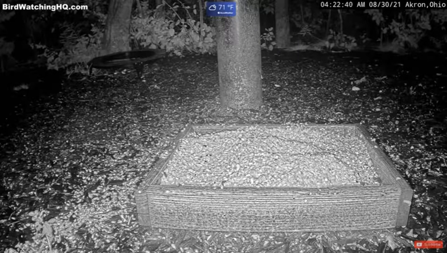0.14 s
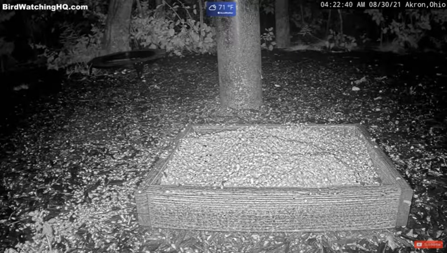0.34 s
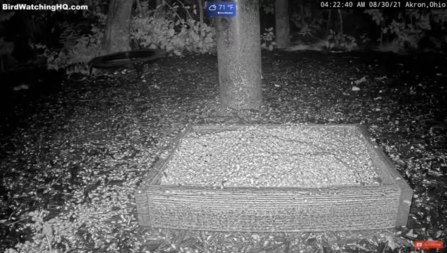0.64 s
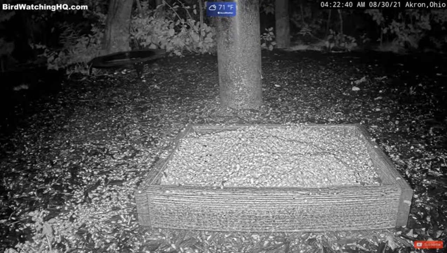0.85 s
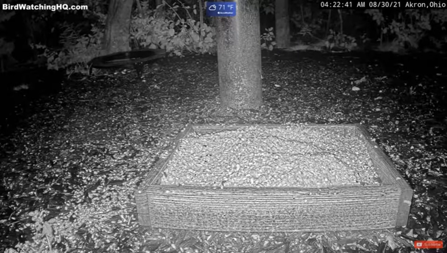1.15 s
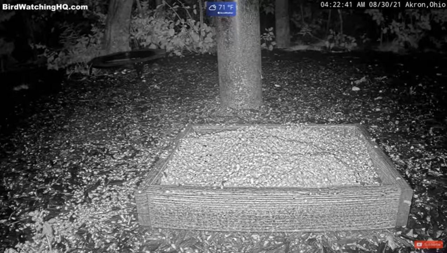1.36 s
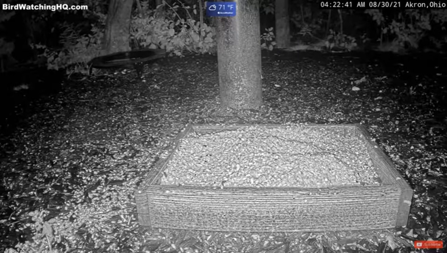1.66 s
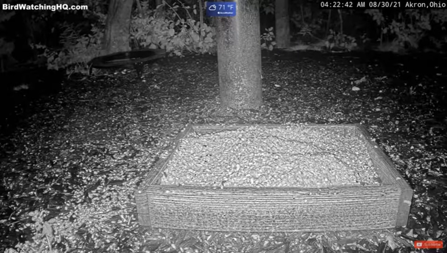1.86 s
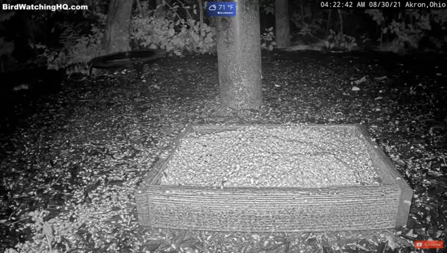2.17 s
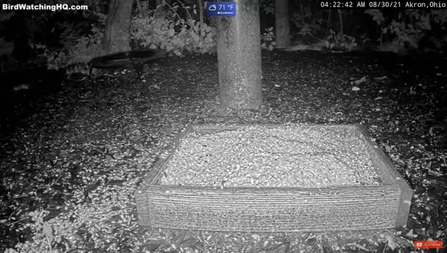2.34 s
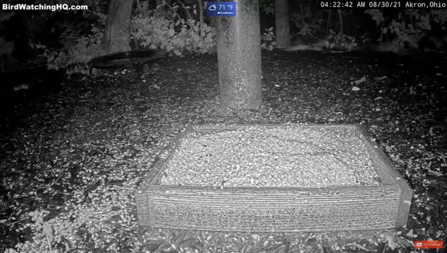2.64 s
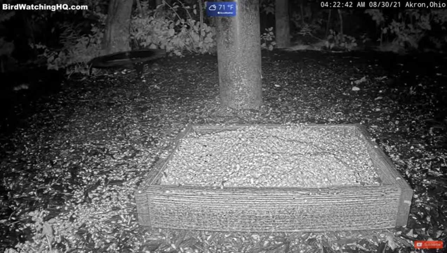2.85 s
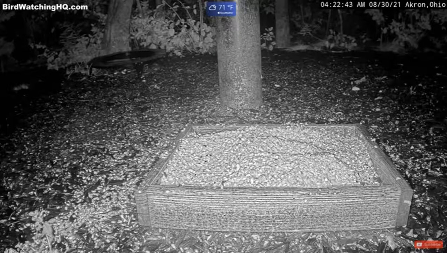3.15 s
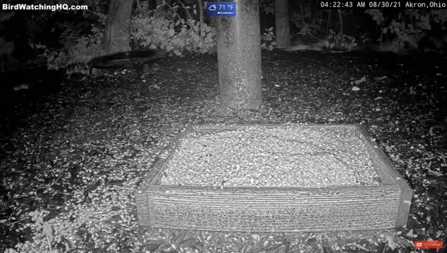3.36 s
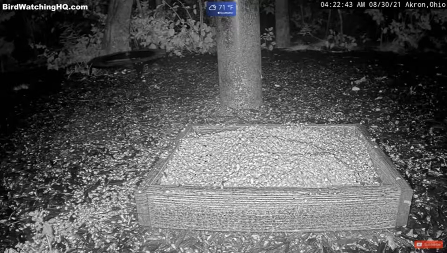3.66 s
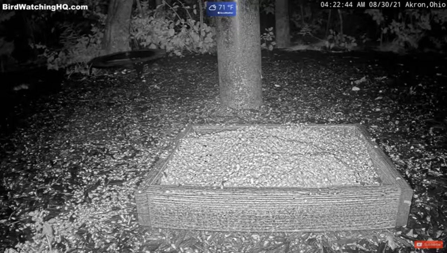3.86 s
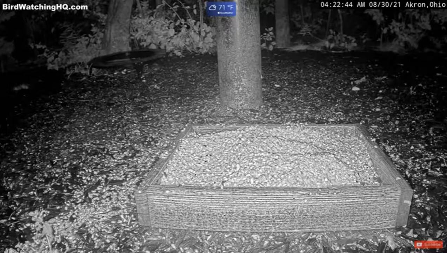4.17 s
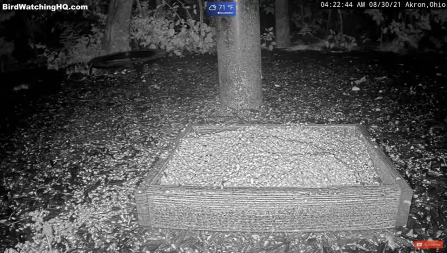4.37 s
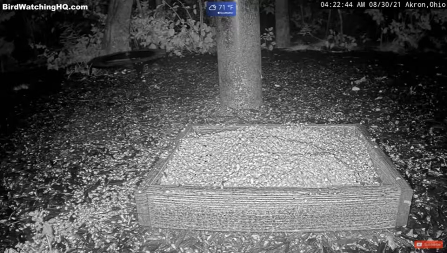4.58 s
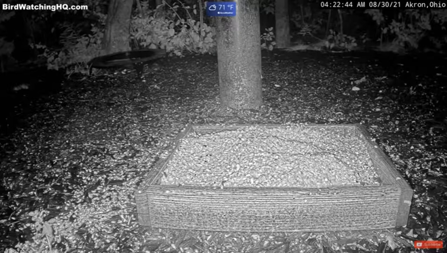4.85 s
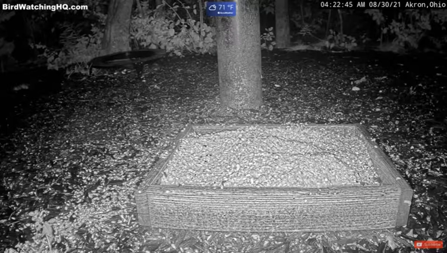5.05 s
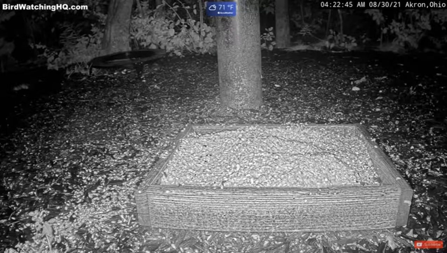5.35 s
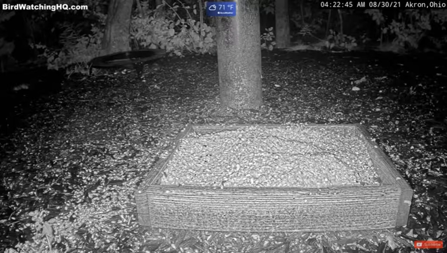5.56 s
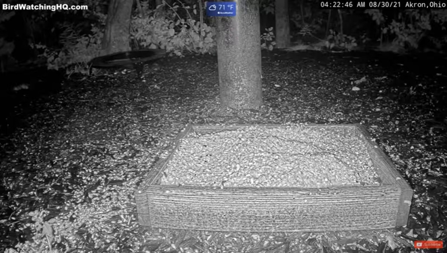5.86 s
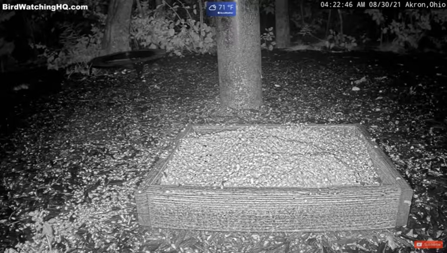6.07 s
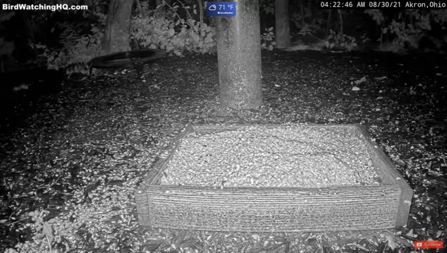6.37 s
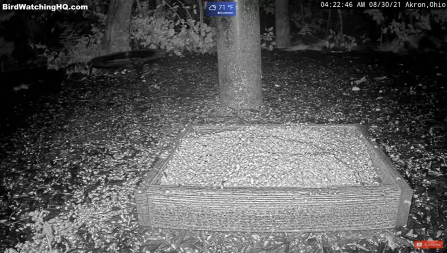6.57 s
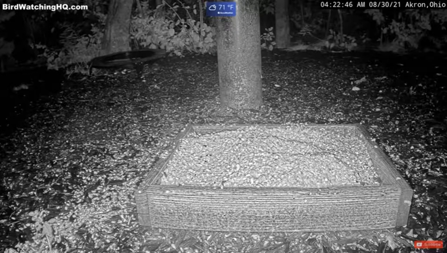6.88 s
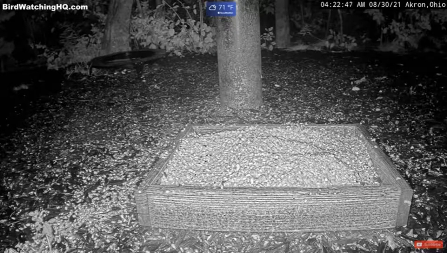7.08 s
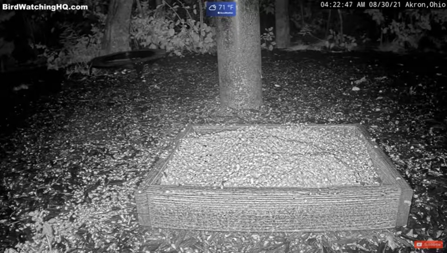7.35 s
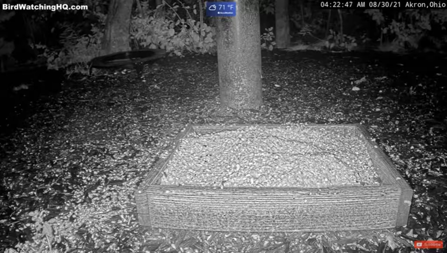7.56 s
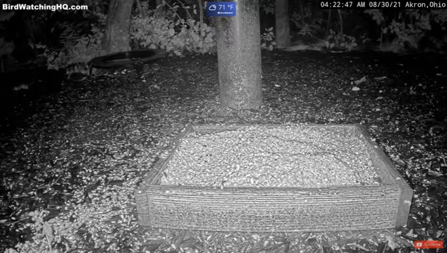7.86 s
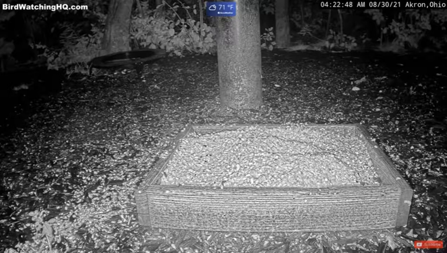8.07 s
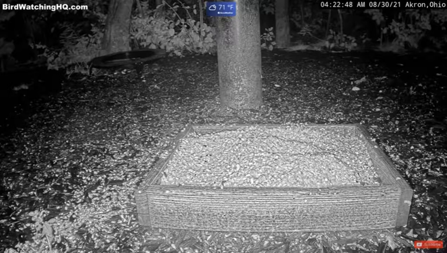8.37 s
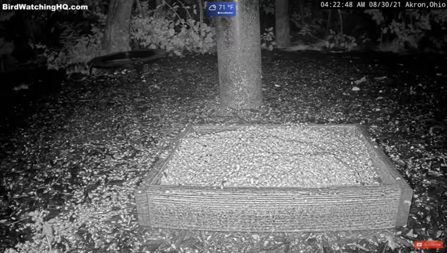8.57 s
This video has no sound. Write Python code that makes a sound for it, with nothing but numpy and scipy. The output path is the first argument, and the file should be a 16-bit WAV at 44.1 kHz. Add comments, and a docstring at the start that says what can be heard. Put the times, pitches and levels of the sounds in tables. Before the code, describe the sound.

Raccoons quarrel in a garden at night with shrill, rasping screeches and short yips. The first bouts are loud and close to the microphone. In a pause, dry leaves tick a few times, then more screeches follow from farther off, with a slight echo from the trees. A faint low growl swells with the cries. Crickets trill high and steady throughout, over a soft hiss and distant traffic hum.

```python
"""Raccoons quarrel at night

Raccoons screech at each other in a garden, first near, then farther off. Their vocal folds flip
between a clear shrill tone, a tone an octave lower (a doubled period) and rasping chaos.
Crickets trill with their wings, far traffic hums, a low growl swells, dry leaves tick and trees echo."""
import sys
import numpy as np
from scipy import signal
from scipy.fft import rfft, irfft, next_fast_len
from scipy.io import wavfile
from scipy.ndimage import uniform_filter1d, map_coordinates

SR = 44100
rng = np.random.default_rng(int(sys.argv[2]) if len(sys.argv) > 2 else 0)


def wav_out(sig):
    """Save sig, one row per channel (or a flat mono array), as 16-bit PCM at SR to the path in sys.argv[1]."""
    wavfile.write(sys.argv[1], SR, np.round(np.clip(np.atleast_2d(sig).T, -1, 1) * 32767).astype(np.int16))


N = 384540


def amp(db):
    """Turn decibels into a gain."""
    return 10 ** (np.asarray(db) / 20)


def unit(x):
    """Scale x to an average strength (rms) of 1."""
    return x / np.sqrt(np.mean(x ** 2) + 1e-20)


def along(points, hz):
    """Read between (frequency, value) points on a log frequency axis."""
    f, values = np.transpose(points)
    return np.interp(np.log(hz + 1), np.log(f + 1), values)


def curves(rows):
    """Turn each column after the time into one value per sample."""
    times, *columns = np.transpose(rows)
    return [np.interp(np.arange(N) / SR, times, column) for column in columns]


def held(rows, rest, fade_s):
    """Hold each row's values from its start to its end, fading to the resting ones in between."""
    out = np.outer(rest, np.ones(N))
    for start, end, *values in rows:
        out[:, round(start * SR):round(end * SR)] = np.array(values)[:, None]
    return uniform_filter1d(out, size=max(round(fade_s * SR), 1), axis=1)


def wobble(rate):
    """A smooth curve through `rate` random points a second."""
    points = rng.standard_normal(int(N * rate / SR) + 4)
    return map_coordinates(points, [np.arange(N) * rate / SR], order=2)


def filtered(x, response):
    """Scale each frequency in x by response(hz)."""
    size = next_fast_len(N + 8192)
    return irfft(rfft(x, size) * response(np.fft.rfftfreq(size, 1 / SR)), size)[:N]


def rush(spectrum, patchy_db):
    """Rushing noise of strength 1, with random louder and softer patches."""
    frames = signal.stft(rng.standard_normal(N + 512), nperseg=512)[2]
    patches = uniform_filter1d(rng.standard_normal(frames.shape), size=4, axis=0)
    patches = uniform_filter1d(patches, size=8, axis=1)
    noise = signal.istft(frames * amp(patchy_db * unit(patches)), nperseg=512)[1][:N]
    return unit(filtered(noise, lambda hz: amp(along(spectrum, hz))))


# How the throat favours some frequencies over others: f/Hz, relative level/dB
THROAT_SHAPE = [(240, -49.5), (400, -37), (733, -34), (1150, -17), (1470, -12.5), (2070, -3), (2210, 3),
                (3000, -3.5), (4280, -4.5), (4630, -0.5), (5420, -3), (6100, 4.5), (7530, -3), (8370, 4),
                (9300, -9.5), (12100, -64), (20500, -120)]
# Where the folds lock into a tone or lose it: start t/s, end t/s, chaos/0-1, period doubling/0-1
FOLD_STATES = [(.105, .135, .25, .2), (.155, .185, .35, .4), (.6, .66, .45, .8), (.66, .755, .3, .15),
               (.755, .84, .52, .2), (.86, .9, .35, .3), (1.82, 1.885, .4, .8), (1.885, 1.945, .08, .65),
               (1.945, 2.0, .5, .7), (2.065, 2.14, .35, .15), (2.16, 2.4, .85, .5), (4.17, 4.215, .35, .7),
               (4.215, 4.32, .42, .6), (4.44, 4.58, .22, .15), (4.58, 4.66, .5, .25), (5.15, 5.34, .32, .3),
               (5.34, 5.45, .52, .2), (5.48, 5.92, .88, .5), (6.33, 6.39, .45, .7), (6.49, 6.6, .3, .15),
               (6.69, 6.8, .4, .2), (7.28, 7.395, .2, .9), (7.395, 7.5, .45, .3), (8.13, 8.48, .24, .05),
               (8.48, 8.55, .42, .3), (8.55, 8.66, .3, .1)]
def vocal_folds(pitch):
    """Vibrating folds make overtones; chaos smears them into torn air. The throat colours both."""
    chaos, doubling = held(FOLD_STATES, rest=[.75, .45], fade_s=.03)
    waver = .014 * wobble(45) + (.003 + .02 * chaos) * wobble(250)
    shaky = 1 + waver + .1 * chaos ** 2 * wobble(500)  # chaos makes the cycles uneven
    phase = 2 * np.pi * np.cumsum(pitch * shaky) / SR
    tone, power = np.zeros(N), np.zeros(N)
    for k in range(1, 12):
        # darker than the air, and weak at the bottom
        size = amp(along(THROAT_SHAPE, k * pitch) - 3.2 * np.log2(k) - 10 * (k == 1))
        size *= doubling if k % 2 else 1  # odd overtones come with the doubled period
        tone += size * amp(5.37 * wobble(30)) * np.sin(k * phase + rng.uniform(0, 2 * np.pi))
        power += size ** 2
    tone *= amp(2.5 * wobble(60) + 4 * chaos * wobble(300)) / np.sqrt(power)  # flutter and rasp
    puffs = (1 + 0.44 * np.cos(2 * phase)) * amp(0.67 * wobble(220))  # one per cycle of the shrill tone
    breath = puffs * rush([(100, 0)], patchy_db=5.0)
    air = unit(filtered(breath, lambda hz: amp(along(THROAT_SHAPE, hz))))
    return np.sqrt(1 - chaos ** 2.4) * tone + chaos ** 1.2 * air


def mouth(x, centre_hz, width_hz, lift_db):
    """The mouth boosts one band, which moves as the jaws open and close."""
    hz, t, frames = signal.stft(x, SR, nperseg=256)
    centre = centre_hz[np.minimum((t * SR).astype(int), N - 1)]
    boost = amp(lift_db / (1 + ((hz[:, None] - centre) / width_hz) ** 2))
    return signal.istft(frames * boost, SR, nperseg=256)[1][:N]


# Long screeches, one list each: t/s, level/dB above 5 kHz,
# then, relative to that, level/dB at 3-5 kHz and level/dB at 1.35-3 kHz
SCREECH_LEVELS = [
    [(0.0, -18.5, -3, -6), (.03, -13.5, -5.5, -9), (.075, -15, -7, -6), (.11, -18, 4.5, -6),
     (.145, -18.5, -4.5, -10.5), (.168, -16, -10.5, -15.5), (.203, -19, -9, -14), (.212, -30.5, -12, -16)],
    [(.692, -23.5, -11, -2), (.722, -15.5, -17.5, -19), (.77, -35, -4, -4), (.825, -21.5, -21.5, -11.5),
     (.838, -40, 0.5, -2)],
    [(.988, -22.5, -10, -7), (.996, -17.5, -8, -14), (1.026, -23.5, -1.5, -4), (1.09, -17.5, 0.5, -9.5),
     (1.106, -28, -7, 1)],
    [(1.745, -30, -12, -13), (1.7505, -11.5, -10, -7), (1.806, -22.5, -5, -6), (1.874, -16.5, -17.5, -13),
     (1.922, -22.5, -1.5, 0.5), (1.95, -23, -18, -18), (1.99, -20, -5.5, -10), (2.05, -26, -1, -3),
     (2.104, -19, 1, 5.5), (2.126, -16, -3, -8.5), (2.186, -21.5, 0.5, -1.5), (2.27, -19.5, -2.5, -4),
     (2.29, -23.5, -3, -2)],
    [(4.228, -40.5, -7, -20), (4.283, -30.5, -10.5, -6.5), (4.34, -30, -4.5, -10.5),
     (4.405, -28.5, -5.5, -2), (4.46, -31.5, -4, -11), (4.505, -39, 7, 7), (4.52, -37, -8, -5)],
    [(5.252, -32, -12, -8), (5.27, -28, -18, -19), (5.304, -38.5, -1.5, -1.5), (5.38, -34, -16.5, -9.5),
     (5.466, -28, -11, -7.5), (5.55, -26, -10.5, -8.5), (5.608, -23.5, -11, -5.5),
     (5.65, -23.5, -19.5, -13.5), (5.74, -27, -15, -11), (5.83, -35, -12.5, -8.5), (5.88, -31, -10.5, -15)],
    [(6.52, -42, -16, -0.5), (6.538, -32, -16, -17.5), (6.612, -35.5, -0.5, -2), (6.665, -30, -14, -22),
     (6.696, -39, -10, -18)],
    [(7.302, -41, -7, -2), (7.33, -30, -1, -6.5), (7.376, -22, -14.5, -15.5), (7.4, -24, -11, -3),
     (7.44, -24.5, -9, -6.5), (7.49, -24.5, -9, -12), (7.525, -34.5, -19, -21), (7.55, -41, -9, -14)],
    [(8.288, -46, 0, -2), (8.305, -38.5, -1, -8), (8.43, -38, -3.5, -7.5), (8.48, -31.5, -5, -10.5),
     (8.515, -37.5, -3, -7), (8.54, -36.5, -14, -18), (8.6, -43.5, 6, -4), (8.682, -43, -3, -7.5),
     (8.72, -28, -8.5, -7)],
]
def cries(pitch):
    """Screeches and yips set the gains of four voice bands, highest first, with silence in between."""
    release_s, release_db = 0.013, -30  # how each cry dies away
    t, gains = np.arange(N) / SR, np.zeros((4, N))
    bottom_db = -36 + 28 * np.clip((800 - pitch) / (800 - 610), 0, 1)  # weak unless the pitch sinks
    for rows in SCREECH_LEVELS + yips():
        ending = np.add(rows[-1], [release_s, release_db, 0, 0])
        times, db, *offsets = np.transpose([*rows, ending])
        now = slice(round(times[0] * SR), round(times[-1] * SR))
        upper = [amp(np.interp(t[now], times, db + offset)) for offset in (0, *offsets)]
        bottom = upper[0] ** 0.66 * amp(bottom_db[now])  # swings less than the treble
        gains[:, now] = np.maximum(gains[:, now], [*upper, bottom])
    return uniform_filter1d(gains, size=160, axis=1)


# Short yips and blips: start t/s, t/s the swell aims for (may lie outside the yip), end t/s,
# level/dB it aims for above 5 kHz, then, relative to that, level/dB at 3-5 kHz and at 1.35-3 kHz
YIP_LEVELS = [(0.624, 0.639, 0.64, -45, -6, 3), (.661, 0.674, 0.68, -16.5, -13, -7),
              (0.844, 0.881, 0.89, -13.5, -14.5, -8.5), (0.906, 0.935, 0.94, -18.5, -7.5, -9.5),
              (0.945, 0.956, 0.98, -16.5, -8, -11), (1.112, 1.129, 1.172, -12.5, -5.5, -11.5),
              (1.64, 1.653, 1.71, -23, -2.5, -10), (1.658, 1.683, 1.692, -12, -7.5, -12),
              (1.702, 1.716, 1.73, -10.5, -8, -11), (2.296, 2.327, 2.384, -17.5, -2.5, -8),
              (4.19, 4.202, 4.29, -30, -7, -13), (4.528, 4.556, 4.65, -33.5, 2, -3.5),
              (4.56, 4.624, 4.706, -31, -6.5, -2.5), (4.664, 4.685, 4.74, -31.5, -3, -2),
              (5.116, 5.142, 5.2, -43.5, 2.5, 6.5), (5.173, 5.167, 5.18, -32.5, 2.5, 5),
              (5.19, 5.222, 5.39, -31, -12.5, -4.5), (6.347, 6.366, 6.45, -45, 6, -0.5),
              (6.376, 6.397, 6.5, -36, -4, -14.5), (6.7, 6.723, 6.77, -40.5, -10, -10),
              (6.728, 6.769, 6.75, -33.5, -4, -8), (7.216, 7.222, 7.3, -47, 0, 3.5),
              (7.24, 7.296, 7.24, -38, -1, -5), (7.554, 7.572, 7.6, -36, -7, -4),
              (8.198, 8.213, 8.232, -60, -6, 12), (8.24, 8.259, 8.285, -50, 6, 9)]
def yips():
    """Level rows for short yips and blips in one tone colour; most swell and fall, a few just cut off."""
    out = []
    for start, aim, end, db, *colour in YIP_LEVELS:
        times = np.linspace(start, end, num=24)
        edge_db = np.where(times < aim, -11.5, -14.5)
        drops = edge_db * np.interp(times, [start, aim, end], [1, 0, 1]) ** 2.08
        out.append([(t, db + drop, *colour) for t, drop in zip(times, drops)])
    return out


# How the voices glide, one list per outburst: t/s, pitch f/Hz (half the shrill tone), mouth f/Hz
VOICE_GLIDES = [
    [(0.0, 1136, 6170), (0.076, 1201, 5750), (0.132, 1185, 4930), (0.15, 1032, 6340), (0.22, 1021, 5670)],
    [(0.61, 598, 5630), (0.648, 674, 6800), (0.668, 910, 6680), (0.79, 786, 5850), (0.88, 1017, 6420),
     (0.95, 986, 5830), (0.972, 893.7, 6050), (1.12, 1021, 5270), (1.18, 899, 5650)],
    [(1.63, 706, 6100), (1.68, 1217, 6900), (1.758, 1200, 6730), (1.806, 1008, 7200), (1.928, 1058, 7130),
     (2.038, 1073, 5480), (2.076, 1189, 5650), (2.106, 1200, 5330), (2.126, 1105, 6670), (2.2, 1045, 5780),
     (2.385, 990.6, 5850)],
    [(4.18, 546.4, 6540), (4.21, 933, 5980), (4.318, 942, 5200), (4.39, 1161, 6650), (4.415, 1040, 6160),
     (4.454, 944, 6440), (4.528, 936, 6200), (4.666, 1021, 6100), (4.73, 934, 5800)],
    [(5.11, 870, 5200), (5.19, 890, 5700), (5.222, 980, 6250), (5.336, 952, 6800), (5.43, 985, 5880),
     (5.598, 1176, 6500), (5.678, 1170, 6300), (5.84, 925, 6080), (5.9, 1028, 5980)],
    [(6.34, 572, 6000), (6.392, 936, 6620), (6.444, 924, 6070), (6.53, 890, 5400), (6.585, 935, 5500),
     (6.618, 1103, 5630), (6.682, 750, 6900), (6.8, 695, 6050)],
    [(7.21, 784, 5583), (7.306, 836, 5640), (7.316, 898, 5630), (7.39, 926, 7000), (7.445, 1022, 6800),
     (7.48, 1000, 6930), (7.555, 800, 6200), (7.59, 936, 5770), (7.68, 910, 5900)],
    [(8.14, 539.7, 5620), (8.206, 684, 5690), (8.234, 676, 5470), (8.252, 775, 4800), (8.29, 845, 5340),
     (8.474, 878, 5420), (8.586, 870, 5910), (8.596, 804, 6240), (8.684, 816.8, 6120), (8.72, 1020, 5970)],
]
def raccoons():
    """Sound from the folds passes through the mouth, then swells and fades in four bands."""
    pitch, mouth_hz = curves(np.concatenate(VOICE_GLIDES))
    voice = mouth(vocal_folds(pitch), mouth_hz, width_hz=500, lift_db=7)
    below = [filtered(voice, lambda hz: np.clip((edge_hz - hz) / 400 + .5, 0, 1))
             for edge_hz in (5000, 3000, 1350)]
    bands = -np.diff([voice, *below, np.zeros(N)], axis=0)
    bands /= np.sqrt(np.abs(uniform_filter1d(bands ** 2, size=1300, axis=1)) + 1e-4)  # even them out
    return np.sum(cries(pitch) * bands, axis=0)


def trill(hz, width_hz, rate, depth):
    """A cricket's wing strokes: a narrow, wavering tone that pulses `rate` times a second."""
    tone = unit(filtered(rng.standard_normal(N), lambda f: 1 / (1 + ((f - hz) / width_hz * 2) ** 4)))
    stroke_phase = 2 * np.pi * np.cumsum(rate * (1 + 0.03 * wobble(7.4))) / SR
    return tone * (1 + depth * np.cos(stroke_phase))


# Far crickets: f/Hz, width/Hz, level/dB, pulse rate/Hz, pulse depth/0-1
FAR_CRICKETS = [(2631.4, 240, -61, 23, 0.02), (5489, 330, -48.5, 66, 0), (5778, 150, -49, 74, 0.2),
                (6229, 220, -51, 63, 0), (6360, 560, -57, 22, 0.7)]
# When the nearest cricket sings: start t/s, end t/s, level/dB
NEAR_CRICKET = [(.5, .62, -61), (1.31, 1.46, -57), (2.764, 3.1, -50.5), (3.267, 3.863, -49),
                (3.904, 4.12, -53), (4.944, 5.13, -47), (6.075, 6.451, -53), (6.999, 7.25, -57.5),
                (7.87, 8.2, -54)]
def crickets():
    """A far chorus trills without a break; one near cricket sings in short phrases."""
    chorus = sum(amp(db + 1.95 * wobble(6.3)) * trill(hz, width_hz, rate, depth)
                 for hz, width_hz, db, rate, depth in FAR_CRICKETS)
    phrases = held([(start, end, amp(db)) for start, end, db in NEAR_CRICKET], rest=[0], fade_s=0.065)[0]
    return chorus + phrases * amp(2.06 * wobble(8)) * trill(hz=4678, width_hz=160, rate=47, depth=0.37)


# Tone colour of far traffic and hiss: f/Hz, relative level/dB
TRAFFIC_SHAPE = [(40, -32.5), (90, -2), (130, 0), (200, 2.5), (400, -8), (750, -16), (1300, -7),
                 (2000, -10), (3500, -10), (4200, -10.5), (5000, 7), (7000, -7.5), (8200, -4),
                 (9500, -10.5)]
def traffic():
    """Far traffic hums under a steady hiss."""
    return amp(-50.5) * rush(TRAFFIC_SHAPE, patchy_db=1.5)


# Tone colour of the low rumble: f/Hz, relative level/dB
RUMBLE_SHAPE = [(29, -78.5), (50, -38), (140, -7.5), (178, -1), (525, -15), (606, -21.5), (700, -18.5),
                (910, -25.5), (1540, -120)]
# Brief swells of the growl: peak t/s, level/dB
GROWL_SWELLS = [(.17, -50), (0.729, -58), (1.18, -52), (1.65, -61), (2.12, -43), (2.2, -48.5),
                (2.27, -44.5), (4.73, -58), (5.27, -61), (5.88, -48), (6.75, -58), (6.97, -58), (7.09, -54),
                (7.16, -50), (7.6, -45.5), (8.23, -57)]
def growl(voices):
    """A low growling rumble follows the voices and swells briefly, mostly with the cries."""
    t = np.arange(N) / SR
    rest_db, swell_fade_s = -63.5, 0.058
    stir = amp(-51) * np.abs(uniform_filter1d(voices ** 2, size=2000)) ** 0.25
    swells = sum(amp(db) * np.clip(1 - np.abs(t - peak) / swell_fade_s, 0, 1) ** 2
                 for peak, db in GROWL_SWELLS)
    return (amp(rest_db) + stir + swells) * rush(RUMBLE_SHAPE, patchy_db=4.0)


# The share of sound sent to the echoes grows as the animals move off: t/s, level/dB
ECHO_SHARE = [(2.5, -10), (4, -6)]
# How long echoes last: f/Hz, t/s to fade by 60 dB
ECHO_FADE = [(500, 0.14), (2000, 0.31), (4000, 0.39), (6000, 0.44), (9000, 0.46)]
# Tone colour of the echoes, nearly even with a slight lift near 6 kHz: f/Hz, level/dB
ECHO_SHAPE = [(800, 0), (2000, -1.5), (4000, -0.5), (6000, 2.5), (9000, -1.5)]
def tree_echoes(x):
    """Trees scatter the sound along paths that change as the animals move."""
    sent = x * amp(curves(ECHO_SHARE)[0])
    out, step = np.zeros(N + 2 * SR), SR // 4
    for start in range(0, N, step):
        hz, t, frames = signal.stft(rng.standard_normal(SR // 2), SR, nperseg=256)
        fade = amp(-60 * t / along(ECHO_FADE, hz)[:, None])
        tail = signal.istft(frames * fade, SR, nperseg=256)[1]
        echo = signal.fftconvolve(sent[start:start + step], tail / np.linalg.norm(tail))
        out[start + 400:][:len(echo)] += echo  # about 9 ms late
    return filtered(out[:N], lambda hz: amp(along(ECHO_SHAPE, hz)))


# Ticks of dry leaves: t/s, relative level/dB, f/Hz
LEAF_TICKS = [(2.9558, -30, 2440), (2.9986, -24, 2820), (3.039, -31, 2820), (3.085, -40, 2790),
              (3.596, -40, 2100), (3.6446, -33.5, 2540), (3.6872, -38.5, 1420)]
def leaves():
    """Each dry leaf gives a short, soft crackle around one pitch."""
    out, t = np.zeros(N), np.arange(1800) / SR
    rise_s, fade_s = 0.0045, 0.048
    for start, db, hz in LEAF_TICKS:
        crackle = rng.standard_normal(len(t)) * amp(-60 * t / fade_s) * (1 - np.exp(-t / rise_s))
        band = signal.butter(2, [hz * .6, hz * 1.5], "bandpass", fs=SR)
        out[round(start * SR) - 80:][:len(t)] += amp(db + 5.5) * signal.lfilter(*band, crackle)
    return out


def scene():
    """Raccoons and leaves echo among the trees, with crickets, traffic and rumble around them."""
    voices = raccoons()
    near = voices + leaves()
    return (near + tree_echoes(near) + crickets() + traffic() + growl(voices))[None]


def record(dry):
    """The microphone drops deep bass and high treble; loud peaks then clip and splash above its range."""
    bass_hz, treble_hz, splash_top_hz, ceiling = 60, 9560, 15850, .8
    heard = filtered(dry[0], lambda hz: (hz < treble_hz) / (1 + (bass_hz / (hz + 1)) ** 2))
    clipped = heard / (1 + np.abs(heard / ceiling) ** 12) ** (1 / 12)
    return filtered(clipped, lambda hz: hz < splash_top_hz)[None]


dry = scene()
out = record(dry)
wav_out(out)
```